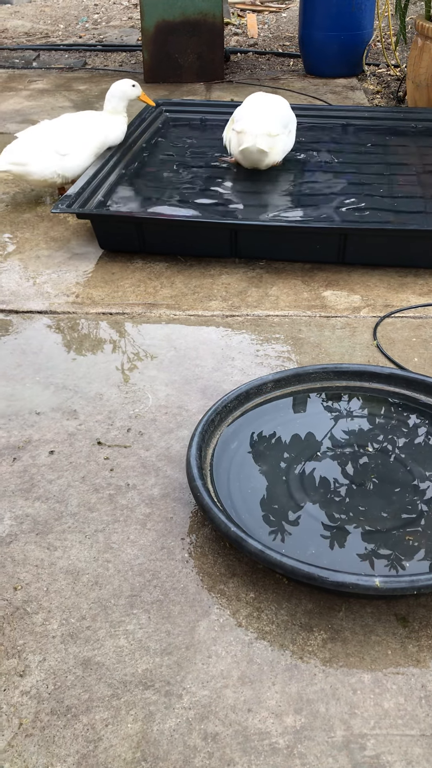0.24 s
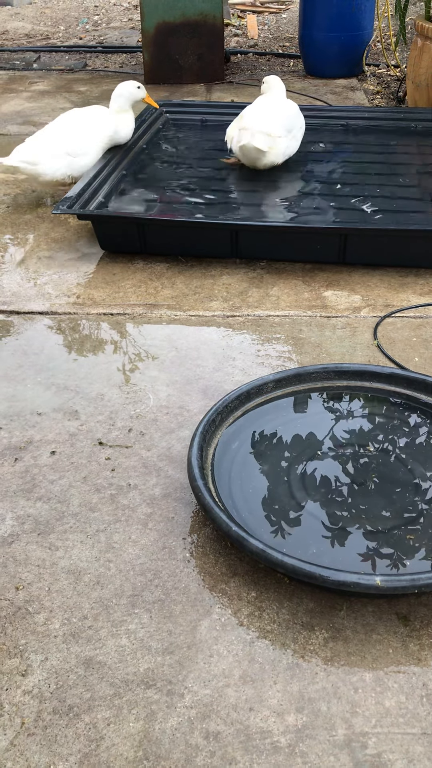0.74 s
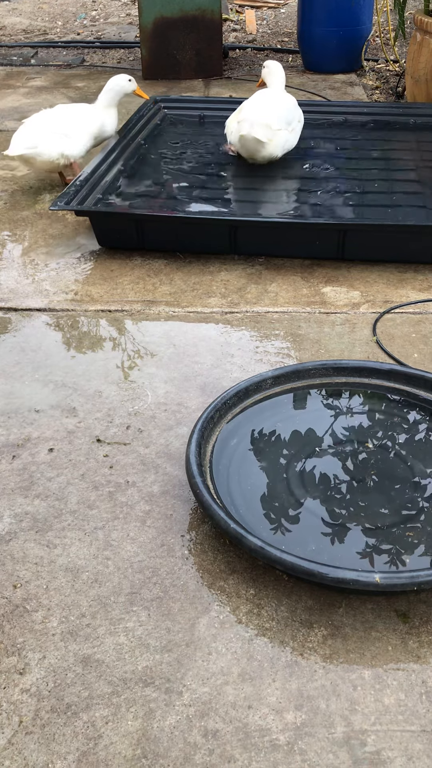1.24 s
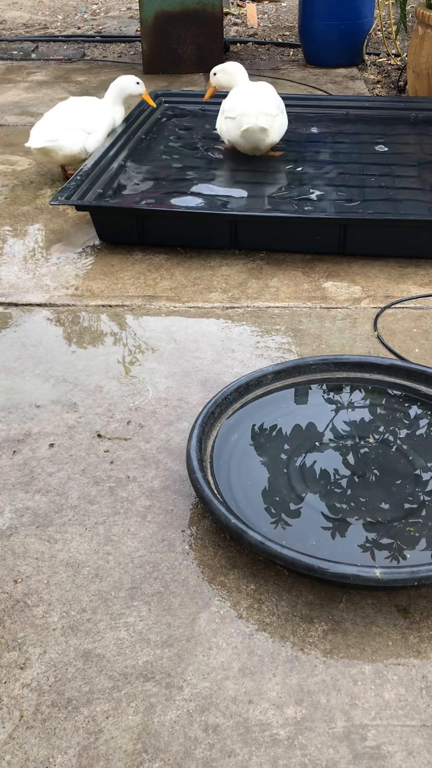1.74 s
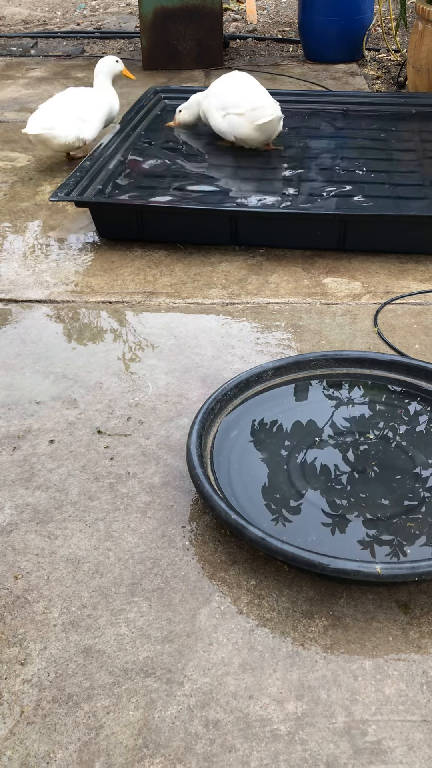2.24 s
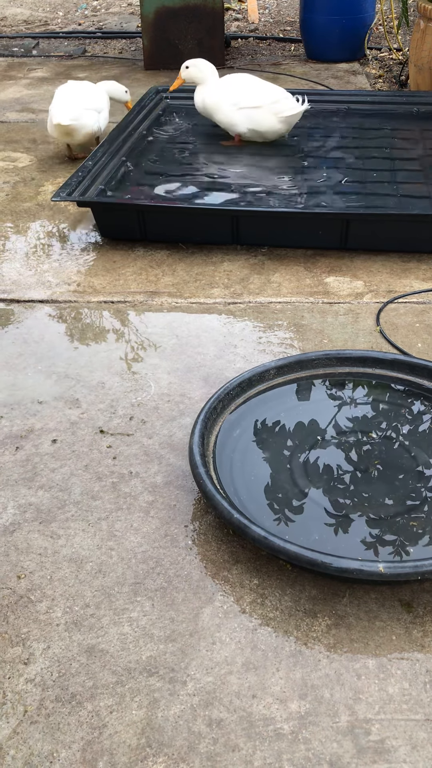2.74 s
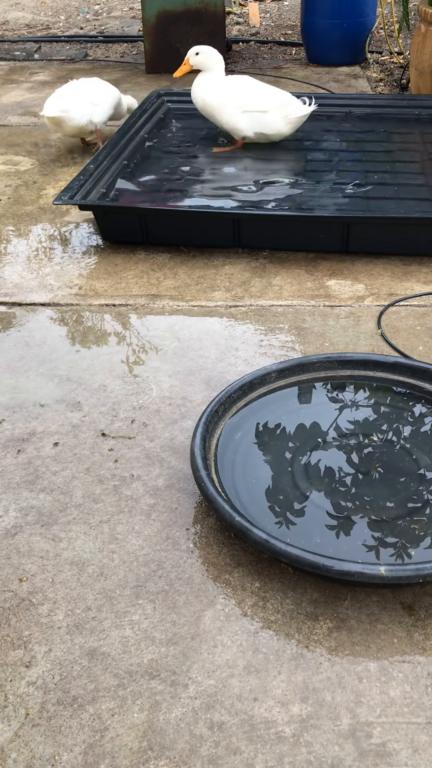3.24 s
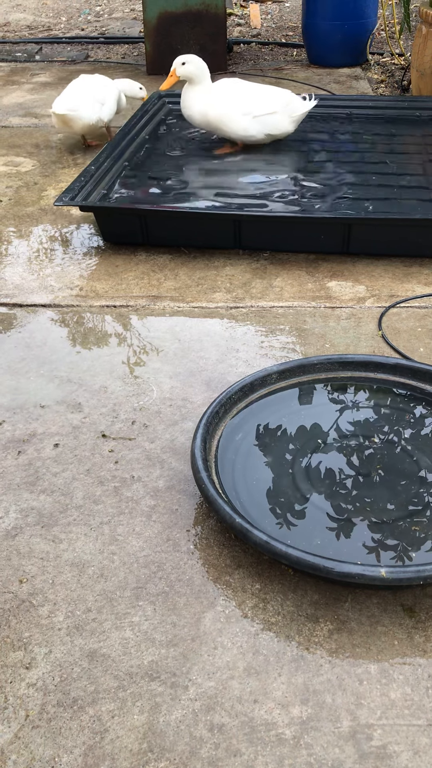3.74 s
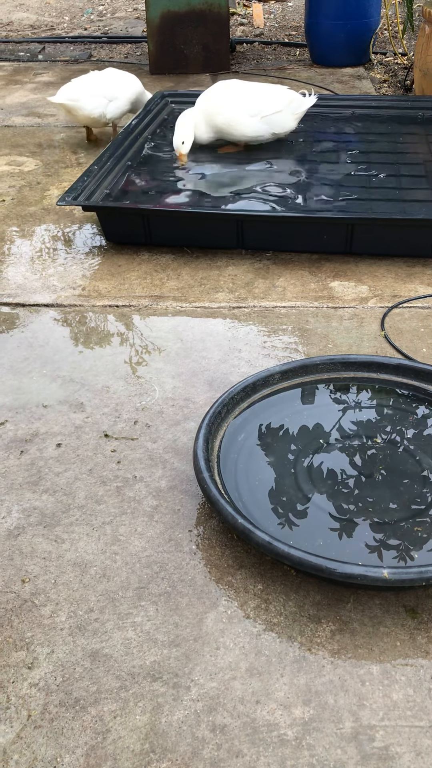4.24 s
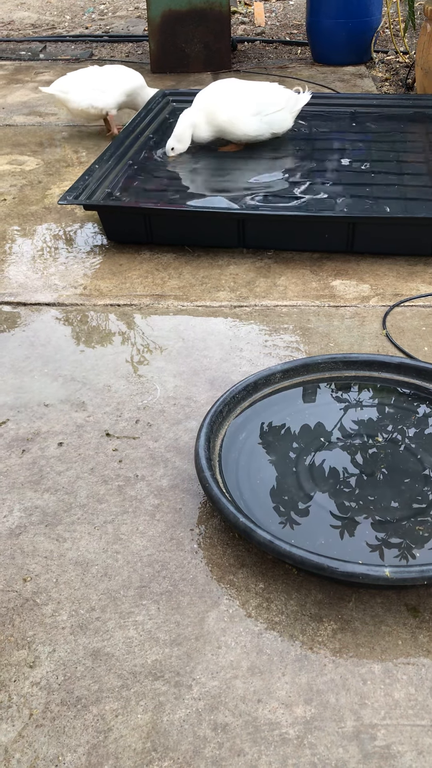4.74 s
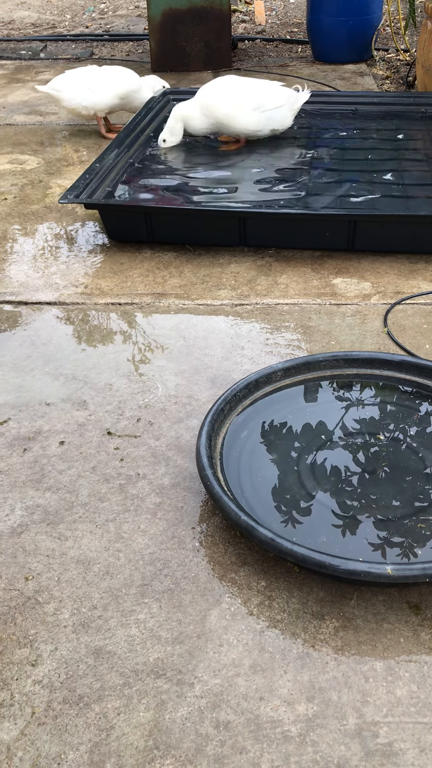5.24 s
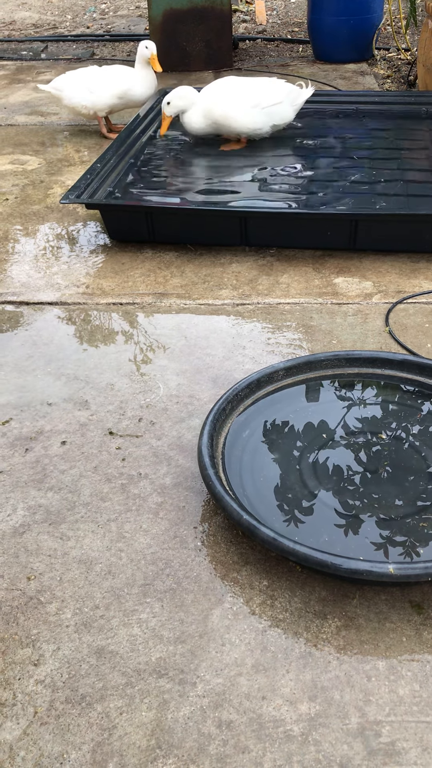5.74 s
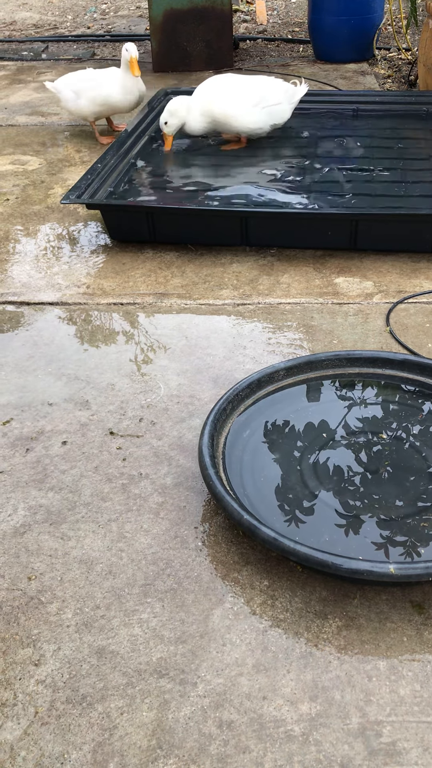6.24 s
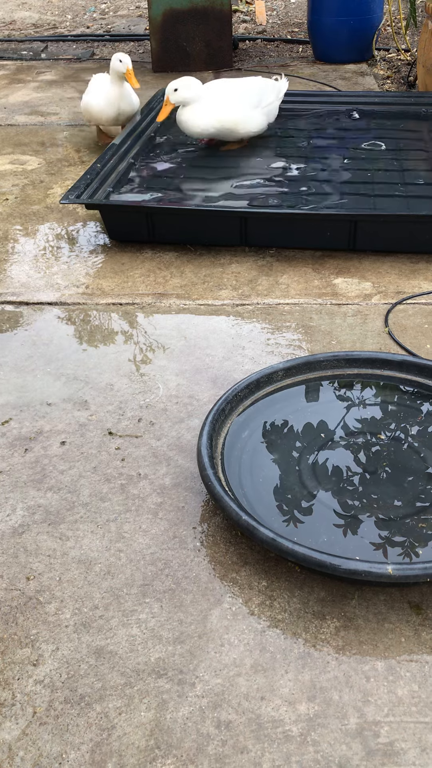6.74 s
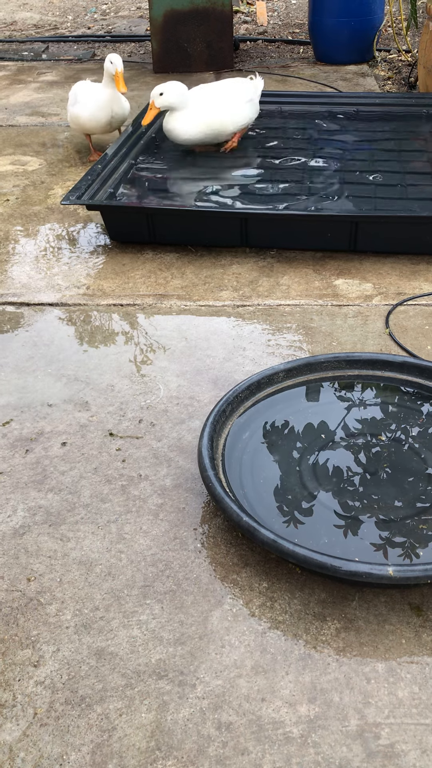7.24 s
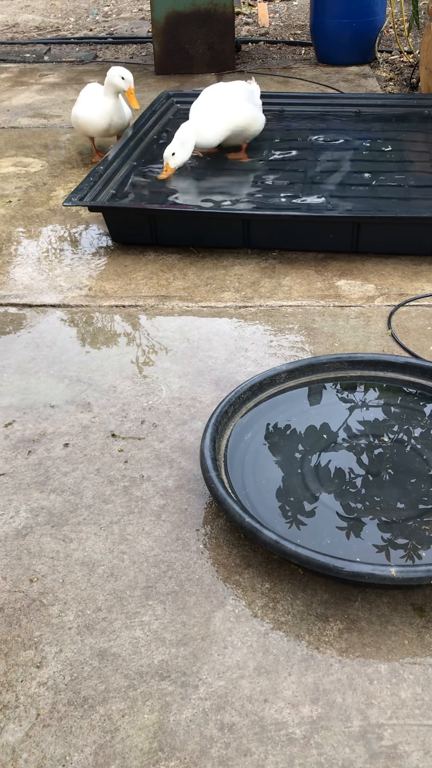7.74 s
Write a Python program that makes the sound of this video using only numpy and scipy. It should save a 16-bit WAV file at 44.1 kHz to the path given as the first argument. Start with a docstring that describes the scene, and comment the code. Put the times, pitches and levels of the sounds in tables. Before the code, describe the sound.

Ducks dabble in a shallow tray with drips, ticks and tiny splats, soft fluttering chatter building to low quacks, over a distant engine hum.

```python
"""Ducks dabble in a shallow tray of water in a concrete yard: soft fluttering chatter, then low pulsed quacks.
Quacks are syrinx pulses ringing a bank of throat resonances; chatter is a string of short upward sweeps.
Splats are noise cracks; drips, gulps and spray are ringing bubbles; trapped air gurgles in gliding tones.
A small bird chirps in wobbling whistles deeper in the echoes; a distant engine hums in low harmonics
over rumbling noise, and coloured noise gives the open air."""
import sys
import numpy as np
from scipy import signal
from scipy.fft import rfft, irfft
from scipy.io import wavfile
from scipy.ndimage import uniform_filter1d

SR = 44100
rng = np.random.default_rng(int(sys.argv[2]) if len(sys.argv) > 2 else 0)


def master_out(mix):
    """Clip the mix to full scale and print it as 16-bit PCM to the path in sys.argv[1]."""
    frames = np.transpose(np.atleast_2d(mix))
    ceiling = np.clip(frames, -1, 1)
    pcm = np.round(ceiling * 32767).astype(np.int16)
    wavfile.write(sys.argv[1], SR, pcm)


N = 353232

# Strokes of wading and dabbling. Each row: start in seconds, length in seconds, rms level of the gulps in dB,
# their centre pitch in Hz, rms level of the fizzing spray in dB before its fade.
SLOSHES = [(.425, 0.058, -70, 705, -69), (.56, 0.14, -66.5, 1140, -84), (0.706, 0.023, -52, 418, -64),
           (0.845, 0.026, -56, 445, -70), (1.379, 0.051, -67, 890, -65), (1.496, 0.06, -56, 733, -70),
           (2.062, 0.061, -61, 760, -65.5), (2.278, 0.18, -71.5, 840, -74), (2.346, .12, -55, 293, -70),
           (2.472, 0.045, -72, 700, -72), (2.591, 0.039, -52, 690, -68), (2.605, 0.031, -53, 305, -82),
           (4.35, .2, -55.5, 288, -81), (4.921, 0.1, -54.5, 329, -69), (5.07, .05, -60, 473, -82),
           (5.141, 0.071, -49, 305, -79), (6.477, 0.068, -60, 700, -63), (6.783, 0.23, -58.5, 713, -67.5),
           (7.569, 0.044, -44.5, 487, -65), (7.804, 0.18, -69, 503, -64)]


def undb(db):
    """Decibels to gain."""
    return 10 ** (np.asarray(db) / 20)


def unit(x):
    """Scale to rms 1."""
    return x / np.sqrt(np.mean(x ** 2) + 1e-18)


def clock(length):
    """Sample times over a length in seconds."""
    return np.arange(max(int(length * SR), 2)) / SR


def add(out, s, x):
    """Mix x into out from time s in seconds."""
    i = int(np.clip(s * SR, 0, N - 1))
    out[i:i + len(x)] += x[:N - i]


def band(x, lo_hz, hi_hz, order=2):
    """Butterworth band-pass."""
    hi_hz = min(hi_hz, .47 * SR)
    lo_hz = min(lo_hz, hi_hz / 2)
    return signal.sosfilt(signal.butter(order, [lo_hz, hi_hz], "band", fs=SR, output="sos"), x)


def walk(rate, size=N):
    """Smooth random wander around zero, taking a new target at the given rate in Hz."""
    k = max(int(SR / rate), 1)
    steps = np.repeat(rng.standard_normal(size // k + 1), k)
    return uniform_filter1d(steps, k)[:size]


def noise(colour):
    """Noise of rms 1 with a spectrum drawn through (Hz, dB) points."""
    hz, db = np.transpose(colour)
    bins_hz = np.fft.rfftfreq(N, 1 / SR)
    gain = undb(np.interp(np.log(bins_hz + 1), np.log(hz), db))
    return unit(irfft(rfft(rng.standard_normal(N)) * gain, N))


def yard(x, wet_db, t60, lo_hz, hi_hz, delay=0.00065):
    """Scattered echoes from tray, fence and walls: a band of noise dying by 60 dB in t60 seconds."""
    t = clock(.6)
    tail = band(rng.standard_normal(len(t)), lo_hz, hi_hz, order=1)
    tail *= np.exp(-np.log(1000) * t / t60) * (t > delay)
    tail *= np.sqrt((hi_hz - lo_hz) / (SR / 2) / np.sum(tail ** 2))
    return x + undb(wet_db) * signal.fftconvolve(x, tail)[:N]


def bubble(hz, t60, rise):
    """A damped ring that builds within a cycle and glides by rise octaves, up as a bubble nears the surface."""
    t = clock(t60)
    envelope = (1 - np.exp(-2 * hz * t)) * np.exp(-np.log(1000) * t / t60)
    glide_hz = hz * 2 ** (rise * t / t60)
    return np.sin(2 * np.pi * np.cumsum(glide_hz) / SR) * envelope


def bubbles(length, rate, centre_hz, octaves, cycles, spread_db, sink=0):
    """A cloud of bubbles of random pitch and size, rms 1 over its length; its pitch may sink by some octaves."""
    out = np.zeros(int((length + .2) * SR))
    for when, pitch, size in rng.random((int(rate * length) + 2, 3)):
        shift = octaves * (2 * pitch - 1) + sink * (.5 - when)
        hz = min(centre_hz * 2 ** shift, SR / 3)
        ring = bubble(hz, cycles / hz, 0.36)
        i = int(when * length * SR)
        # many quiet bubbles, a few loud ones
        out[i:i + len(ring)] += ring[:len(out) - i] * undb(-spread_db * np.log(0.0018 + size))
    return out * np.sqrt(length * SR / np.sum(out ** 2))


def engine():
    """Low harmonics of a slightly unsteady engine over a swelling rumble."""
    # Harmonics of the hum. Each row: multiple of the turning rate, rms level in dB before the level moves.
    harmonics = [(2, -54), (3, -53), (4, -68), (6, -75.5)]
    # How strongly the hum carries. Each row: time in seconds, level change in dB.
    carry = [(0, -6), (.7, 4), (1.7, 1), (3.0, 6), (4.2, 2.5), (5.7, 2.5), (7.3, -11), (8, -8)]
    # Swell of the rumble. Each row: time in seconds, rms level in dB.
    rumble_swell = [(0, -45.5), (.5, -51.5), (1.75, -51.5), (2.3, -43), (4.6, -48), (4.9, -42), (5.7, -45),
                    (6.6, -44.5), (8, -51.5)]
    # Colour of the rumble. Each row: frequency in Hz, relative density in dB per Hz.
    rumble_colour = [(15, -63), (25, -62), (35, -10), (50, -6.5), (75, 4.5), (110, 3), (135, -1.5),
                     (170, -13.5), (230, -17.5), (400, -28), (1000, -62)]
    turning_hz = 46.62
    t = np.arange(N) / SR
    turns = np.cumsum(turning_hz * (1 + 0.0053 * walk(3.104))) / SR
    hum = np.zeros(N)
    for multiple, db in harmonics:
        level = np.sqrt(2) * undb(db + 1.37 * walk(3.3))
        hum += level * np.sin(2 * np.pi * (round(multiple) * turns + rng.random()))
    hum *= undb(np.interp(t, *np.transpose(carry)))
    rumble = undb(np.interp(t, *np.transpose(rumble_swell))) * noise(rumble_colour)
    return hum + rumble


def open_air():
    """The yard's air: steady coloured noise whose level wanders slightly."""
    # Colour of the air. Each row: frequency in Hz, relative density in dB per Hz.
    air_colour = [(100, 3), (250, 3.5), (470, -6.5), (700, -.5), (1200, -6.5), (2000, -15), (4000, -20),
                  (7000, -20.5), (10000, -26), (13500, -22), (16000, -27.5)]
    return undb(-62 + .5 * walk(6.3)) * noise(air_colour)


def sloshes(spray_hz=4300, tick_db=-78, lap_db=-75):
    """Each stroke gulps low and fizzes high in clouds of bubbles; ripples tick and lap throughout."""
    linger_s, fade_db = .03, 5  # spray outlasts the stroke and fades by this much
    out = np.zeros(N)
    for s, length, gulp_db, gulp_hz, spray_db in SLOSHES:
        gulps = bubbles(length, rate=600, centre_hz=gulp_hz, octaves=1.05, cycles=14, spread_db=1.8, sink=0.55)
        add(out, s, undb(gulp_db) * gulps)
        spray_s = length + linger_s
        spray = bubbles(spray_s, rate=1500, centre_hz=spray_hz, octaves=1.7, cycles=28, spread_db=2.6)
        fade = fade_db * np.arange(len(spray)) / SR / spray_s
        add(out, s, undb(spray_db - fade) * spray)
    ticks = bubbles(N / SR, rate=220, centre_hz=7500, octaves=1.1, cycles=14, spread_db=3.3)
    laps = bubbles(N / SR, rate=40, centre_hz=850, octaves=1, cycles=25, spread_db=2.5)
    ripples = unit(undb(4 * walk(7)))
    return out + undb(tick_db) * ripples * ticks[:N] + undb(lap_db) * laps[:N]


def drips():
    """Single plinks and plops: a noise tick as the drop lands, then the ring of the bubble it traps."""
    # Each row: start in seconds, bubble pitch in Hz, level in dB, pitch rise in octaves.
    drops = [(0.103, 2870, -44, 0.5), (.912, 3780, -51, 0), (1.344, 1500, -50, 4.5), (1.356, 984, -44.5, 1),
             (1.451, 1166, -46.5, -0.4), (2.003, 5760, -32, 1.5), (2.002, 1490, -46.5, 2),
             (2.0897, 3120, -55, -0.5), (2.098, 1340, -53, 0.5), (2.191, 1176, -46, 1.5),
             (2.2924, 2780, -60, 0), (2.335, 2760, -45.5, -.4), (2.344, 4650, -48, 3),
             (2.358, 4120, -56, 3), (2.372, 5570, -45, 7), (2.381, 3340, -49.5, 0),
             (2.398, 2900, -51, -0.5), (2.4325, 4270, -46, 2), (2.444, 3080, -53, 0), (2.458, 3150, -58, 2),
             (2.487, 5380, -46.5, 1), (2.567, 2590, -56, 1.5), (2.766, 2290, -37.5, 1),
             (2.826, 4280, -47, 2), (3.307, 3580, -42.5, 0.7), (3.356, 7000, -49, -0.5),
             (3.361, 1320, -47.5, 0.5), (5.142, 1820, -43.5, 0.5), (6.041, 2750, -51.5, 0),
             (6.081, 1300, -52.5, 2), (6.52, 2940, -49, -0.5), (6.565, 6150, -52, -1),
             (7.563, 5230, -34.5, -.5), (7.717, 7000, -53, 0), (7.87, 6360, -47, -0.5),
             (7.917, 2150, -49, -1)]
    tick_db, ring_cycles = -7, 66  # tick against ring; a fixed count of cycles lets big bubbles ring longer
    out, t = np.zeros(N), clock(.006)
    for s, hz, db, rise in drops:
        tick = band(rng.standard_normal(len(t)) * np.exp(-t / .0007), .8 * hz, 2 * hz, order=1)
        add(out, s, undb(db + tick_db) * tick / np.abs(tick).max())
        add(out, s, undb(db) * bubble(hz, ring_cycles / hz, rise))
    return out


def splats(droplet_db=-15, scatter_s=.013, body_db=-7, count=9):
    """Bill and feet slap the water: a sharp wet crack with a short hiss, and droplets scattered mostly after it."""
    # Each row: start in seconds, peak level of the crack in dB, centre in Hz, time for the hiss to fall 60 dB in seconds.
    slaps = [(0.5416, -46.5, 11800, 0.033), (.709, -55, 3000, .02), (.866, -46, 2600, 0.016),
             (1.237, -44, 3900, 0.089), (1.493, -38.5, 5170, 0.092), (1.867, -42.5, 3440, 0.024),
             (1.965, -44.5, 2996, 0.039), (1.9983, -41.5, 5700, 0.056), (2.089, -48, 3200, .04),
             (2.1908, -45.5, 2580, 0.0049), (2.263, -54.5, 4200, .006), (2.302, -46, 9000, .02),
             (2.385, -49, 3300, .04), (2.495, -46, 4830, 0.069), (2.615, -45, 2480, 0.033),
             (3.308, -43, 5660, .018), (3.4264, -37, 7000, 0.0039), (3.451, -47, 2900, .006),
             (3.7159, -34, 7400, 0.011), (3.834, -42, 3080, 0.021), (4.325, -48, 6000, .05),
             (4.444, -46.5, 14100, 0.054), (4.666, -43, 5100, .025), (4.913, -45.5, 3300, 0.044),
             (4.9382, -43, 4070, 0.076), (5.1438, -45, 2800, 0.023), (5.5503, -44.5, 3820, 0.023),
             (5.784, -42.5, 12800, 0.0094), (5.9399, -36.5, 2540, 0.0052), (5.981, -36, 6250, 0.011),
             (6.288, -45.5, 3420, 0.0054), (6.659, -44.5, 5500, .006), (6.905, -43, 8500, .02),
             (6.9166, -33.5, 3750, 0.0098), (7.2896, -30.5, 4680, 0.0076), (7.295, -36.5, 7740, .02),
             (7.4894, -36, 4120, 0.0075), (7.5255, -31.5, 9100, 0.017), (7.563, -35, 5260, .012),
             (7.5812, -32.5, 6660, 0.024), (7.669, -41, 6640, 0.022), (7.925, -41.5, 6000, 0.017)]
    hiss_db = -5  # against the first crack
    out, t = np.zeros(N), clock(.06)
    # every stroke through the water also throws one small splat
    small = []
    for s, length, *_ in SLOSHES:
        small.append((s + length * rng.random(), -50.5, 4940 * 2 ** rng.uniform(-0.82, 1), 0.036))
    for s, db, hz, t60 in slaps + small:
        decay = np.exp(-t / .001) + undb(hiss_db) * np.exp(-np.log(1000) * t / t60)
        burst = rng.standard_normal(len(t)) * decay * np.minimum(t / .0004, 1)
        body = band(burst, 1200, 10700, order=1)
        crack = band(burst, hz / 1.04, hz * 1.25, order=1) + undb(body_db) * body
        add(out, s, undb(db) * crack / np.abs(crack).max())
        for late, pitch, size in rng.standard_normal((count, 3)):
            drop_hz = min(1.14 * hz * 1.5 ** pitch, SR / 3)
            droplet = undb(db + droplet_db + 2 * size) * bubble(drop_hz, 0.0045, 0.44)
            add(out, s + scatter_s * (abs(late) - .25), droplet)
    return out


def chatter(low_hz=1230):
    """Fluttering whistles: each pulse is an upward sweep, furthest mid-call, with rasp and overtones from the bill."""
    # Each row: start in seconds, length in seconds, pulse rate in Hz, level in dB before halving and the call's arch,
    # top of the whistle in Hz before scatter, roughness from 0 to 1, overtone level in dB.
    calls = [(0.464, 0.072, 72, -52, 1820, 0.8, -18), (0.748, 0.066, 76.6, -47, 2770, 0.77, -11.5),
             (1.237, 0.066, 72, -51.5, 2220, 0.75, -10), (1.509, 0.074, 74.45, -47.5, 2410, 0.73, -6.5),
             (1.869, 0.072, 71.7, -40.5, 2110, 0.37, -21), (3.837, 0.06, 70.1, -45.5, 2730, 0.6, -15),
             (5.554, 0.06, 66.6, -43, 1914, 0.32, -18), (5.94, .062, 65, -39, 2395, 0.31, -17),
             (6.289, 0.062, 66, -39.5, 2540, 0.15, -22), (6.414, 0.068, 59, -45.5, 1920, 0.2, -17.5),
             (6.577, 0.07, 71.3, -40, 3640, 0.47, -15), (6.922, 0.055, 84.3, -40.5, 3090, 0.65, -6.5),
             (7.156, 0.07, 72.8, -35, 2980, 0.15, -12), (7.496, 0.07, 75.1, -35, 2380, 0.5, -14),
             (7.634, 0.07, 58.1, -42.5, 1917, 0.13, -19)]
    scatter_db, sweep_scatter = 1.8, .15  # from pulse to pulse, in strength and as a share of the sweep
    warble = .16  # pitch share at full roughness
    bill_lo_hz, bill_hi_hz = 4000, 5700
    out = np.zeros(N)
    for s, length, rate, db, top_hz, rough, overtone_db in calls:
        t, rough = clock(1 / rate), np.clip(rough, 0, 1)
        cycle, pulses = t * rate, max(round(length * rate), 1)
        for k in range(pulses):
            effort = np.sin(np.pi * (k + .5) / pulses)
            reach, strength = rng.standard_normal(2)
            top = low_hz + (top_hz - low_hz) * effort * (1 + sweep_scatter * reach)
            sweep = low_hz + (top - low_hz) * np.sin(np.pi / 2 * cycle ** 1.3) ** 2
            sweep *= 1 + warble * rough * walk(1100, size=len(t))
            phase = 2 * np.pi * np.cumsum(sweep) / SR
            whistle = np.sqrt(2 - 2 * rough) * np.sin(phase)
            rasp = unit(band(rng.standard_normal(len(t)), 1000, max(top, 1600), order=3))
            overtones = np.sin(2 * phase) + .5 * np.sin(3 * phase) + rng.standard_normal(len(t))
            overtones = unit(band(overtones, bill_lo_hz, bill_hi_hz))
            voice = whistle + np.sqrt(rough) * rasp + undb(overtone_db) * overtones
            swell = np.sin(np.pi * cycle) * undb(2.5 * walk(500, size=len(t)))
            level = undb(db + scatter_db * strength) / 2 * effort
            add(out, s + k / rate, level * unit(swell * voice))
    return out


def chirp(length, pitches, wobble, sideband_db=-14, sideband_hz=700):
    """A short buzzy whistle; the more it wobbles, the more sidebands from the second side of the syrinx."""
    t = clock(length)
    buzz = .6 * np.sin(2 * np.pi * 290 * t) + .5 * walk(500, size=len(t))
    hz = np.interp(t / length, [0, .5, 1], pitches) * (1 + wobble * buzz)
    beat = 1 + 2 * undb(sideband_db) * np.tanh(20 * wobble) * np.sin(2 * np.pi * sideband_hz * t)
    flicker = undb(3.5 * walk(160, size=len(t)))
    return np.sin(np.pi * t / length) * unit(flicker) * beat * np.sin(2 * np.pi * np.cumsum(hz) / SR)


def bird():
    """The same short song of whistles about every two seconds; single peeps before, between and once within songs."""
    # Notes of the song. Each row: start in seconds into the song, length in seconds, start, middle and end pitch
    # in Hz, level in dB against the song, wobble as a share of pitch.
    notes = [(0.005, 0.06, 3900, 4700, 4300, -9, 0.07), (0.025, .075, 3450, 3195, 2740, -6, 0.073),
             (0.14, 0.051, 4070, 5380, 4900, -11, 0.08), (0.154, .075, 4400, 4200, 3700, -2.5, 0.065),
             (.165, .085, 3900, 3510, 2787, -4, 0.085), (0.214, .06, 4400, 4056, 3510, -8.5, 0.069)]
    # Each row: start of a song in seconds, its level in dB.
    songs = [(1.529, -53.5), (3.436, -51), (5.287, -51), (7.615, -55)]
    # Each row: start of a peep in seconds, length in seconds, reference pitch in Hz, level in dB.
    peeps = [(0.602, 0.072, 5370, -62), (1.643, 0.052, 5200, -61), (2.706, 0.097, 5040, -64),
             (4.474, 0.069, 5170, -60)]
    peep_shape = np.array((.99, .97, .8))  # nearly holds its pitch, then drops
    out = np.zeros(N)
    for s, song_db in songs:
        for late, length, *pitches, db, wobble in notes:
            add(out, s + late, undb(song_db + db) * chirp(length, pitches, wobble))
    for s, length, hz, db in peeps:
        add(out, s, undb(db) * chirp(length, hz * peep_shape, wobble=.04))
    return out


def gurgles():
    """Hollow gliding notes from pockets of air under the bill and feet, changing size."""
    # Each row: start in seconds, length in seconds, start, middle and end pitch in Hz, level in dB.
    pockets = [(0.728, .05, 720, 810, 780, -57), (0.875, 0.059, 556, 542, 560, -58.5),
               (0.949, 0.057, 615, 797, 690, -50.5), (1.067, 0.048, 875, 783, 600, -58.5),
               (2.215, 0.065, 1085, 840, 746, -60), (2.536, 0.031, 670, 734, 860, -53),
               (4.534, 0.024, 600, 580, 570, -57), (5.142, 0.033, 700, 618, 580, -51),
               (6.79, .03, 640, 582, 620, -48.5), (6.81, 0.038, 970, 1347, 1800, -54),
               (7.569, 0.053, 778, 522, 340, -47)]
    out = np.zeros(N)
    for s, length, *pitches, db in pockets:
        t = clock(length)
        hz = np.interp(t / length, [0, .5, 1], pitches) * (1 + .03 * walk(200, size=len(t)))
        envelope = np.sin(np.pi * (t / length) ** .7) * undb(2 * walk(150, size=len(t)))
        add(out, s, undb(db) * envelope * np.sin(2 * np.pi * np.cumsum(hz) / SR))
    return out


def quacks(puff_db=-24):
    """A few uneven syrinx pulses while the bill moves; each rings the throat and lets out a puff of air."""
    # Each row: time of the main pulse in seconds, pulses before it, pulses after it, pulse rate in Hz, level in dB,
    # swell up to the main pulse in dB, fade after it in dB, chest in dB, brightness in dB, bill opening as a ratio,
    # change of that ratio over the quack, roughness from 0 to 1.
    calls = [(5.748, 1, 4, 105.7, -37, 2, 8, 6, -11, 0.81, -0.011, 0.31),
             (6.002, 1, 2, 101.8, -38.5, -5, 16, 13, -1, 0.78, 0, 0),
             (6.3753, 2, 1, 108.5, -27.5, 3.5, 7, 3.5, -3, 0.88, -0.09, 0.27),
             (6.492, 2, 2, 107.8, -28.5, 5.5, 6, 0.5, -14, 0.97, -0.023, 0.31),
             (6.6251, 2, 4, 149.5, -23.5, 4, 5, -4.5, -0.5, .98, -0.082, 0.69),
             (6.9573, 2, 2, 92.6, -27.5, 5.5, 4, 2.5, -11, 0.95, -0.0074, 0.49),
             (7.0684, 1, 1, 99.1, -22.5, 8, 13, 0.5, 3, 1.01, 0.018, 0.03),
             (7.3324, 3, 0, 105.1, -23.5, 5.5, 0, 0.5, 6.5, 0.99, 0.057, 0),
             (7.4424, 1, 2, 100.1, -20.5, 8.5, 2.5, 0.5, 2.5, 1.01, -0.067, 0.07),
             (7.5441, 2, 1, 106.9, -23.5, 3.5, -2, -0.5, 2.5, 1.03, 0.00039, 0.2),
             (7.681, 1, 2, 98.1, -19.5, 8.5, 6, -1.5, -3.5, 0.99, -0.046, 0.24),
             (7.7641, 3, 1, 142.7, -18.5, 8.5, 6, -8.5, -8, 1.04, -0.083, 0.35),
             (7.9391, 0, 3, 101.5, -23, 0, -1, -2, -2.5, 1.05, -0.026, 0.11),
             (7.9866, 1, 1, 108.4, -22, 6, 18, -3.5, -1.5, 1.05, -0.015, 0.07)]
    # Throat resonances. Each row: frequency in Hz, width in Hz, level in dB before weighting by the width.
    throat = [(219, 35, 8), (306, 51, 4), (407, 35, -4), (667.5, 44, 7), (752, 20, 0), (1215, 63, 9),
              (1310, 65, 6), (1598, 37, 6), (2060, 35, -17), (2860, 140, -8), (3250, 320, -13.5),
              (3730, 110, -16), (4350, 130, -14), (4920, 130, -26), (5500, 190, -19)]
    mouth_waver, upper_waver = .011, .03  # share by which resonances stray from pulse to pulse
    croak_s, puff_s = .003, .003  # decay times
    out, t = np.zeros(N), clock(0.069)
    hz, width, db = np.transpose(throat)[:, :, None]
    chest, upper = hz < 1000, hz > 2400
    waver = np.where(upper, upper_waver, mouth_waver)
    # the upper resonances alternate in phase, one after another
    sign = np.where(upper, (-1) ** np.arange(len(hz))[:, None], 1)
    for s, before, after, rate, peak_db, swell_db, fade_db, chest_db, bright_db, opening, glide, rough in calls:
        before, after = round(before), round(after)
        gain = width * undb(db + chest_db * chest + bright_db * upper)
        for k in range(-before, after + 1):
            # a wider bill raises all but the chest resonances
            bill = opening + glide * k / max(before + after, 1)
            mouth = np.where(chest, 1, bill) + waver * rng.standard_normal(hz.shape)
            colour = gain * undb(np.where(upper, 4, 2) * rng.standard_normal(hz.shape))
            rings = np.exp(-np.pi * width * t) * np.sin(2 * np.pi * hz * mouth * t)
            pulse = np.sum(sign * colour * rings, axis=0)
            # in a rough quack the syrinx rattles on for a moment after each pulse
            rattle = rng.standard_normal(len(t)) * np.exp(-t / croak_s)
            croak = signal.fftconvolve(pulse, rattle)[:len(t)]
            croak *= rough / np.abs(croak).max()
            breath = unit(band(rng.standard_normal(len(t)), 1750, 3740))
            puff = undb(puff_db + bright_db) * breath * np.exp(-t / puff_s)
            # every pulse but the main one strays in time and level
            late, uneven = rng.standard_normal(2) * (k != 0)
            when = s + (k + (.015 + .15 * rough ** 2) * late) / rate
            drop_db = swell_db * -k / before if k < 0 else fade_db * k / max(after, 1)
            drop_db += 1.3 * uneven
            voice = (1 - rough / 3) * pulse / np.abs(pulse).max() + croak + puff
            add(out, when, voice * undb(peak_db - drop_db))
    return band(out, 120, 5800, order=6)


def scene():
    """Ducks and water close by, the bird deeper among the echoes, engine and air without echoes."""
    background = engine() + open_air()
    water = yard(sloshes() + drips() + splats() + gurgles(), wet_db=-8, t60=.17, lo_hz=200, hi_hz=14000)
    soft_calls = yard(chatter(), wet_db=-4, t60=.2, lo_hz=600, hi_hz=7000)
    chirps = yard(bird(), wet_db=4.5, t60=.5, lo_hz=2000, hi_hz=7000)
    low_calls = yard(quacks(), wet_db=-9.5, t60=.22, lo_hz=150, hi_hz=5000)
    return (background + water + soft_calls + chirps + low_calls)[None]


def record(dry):
    """A steep elliptic low-pass cuts the very top of the treble."""
    top_hz = 16200
    return signal.sosfilt(signal.ellip(10, .2, 70, top_hz, fs=SR, output="sos"), dry)


dry = scene()
out = record(dry)
master_out(out)
```